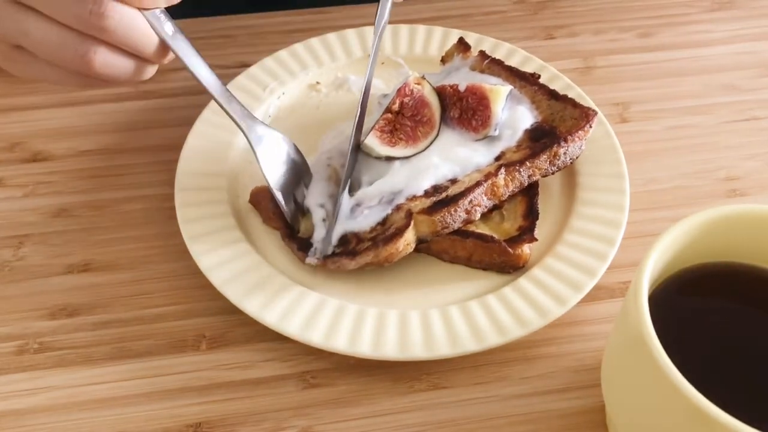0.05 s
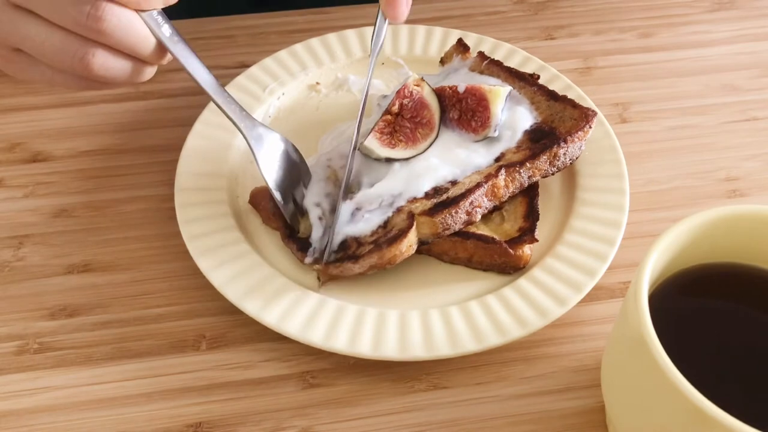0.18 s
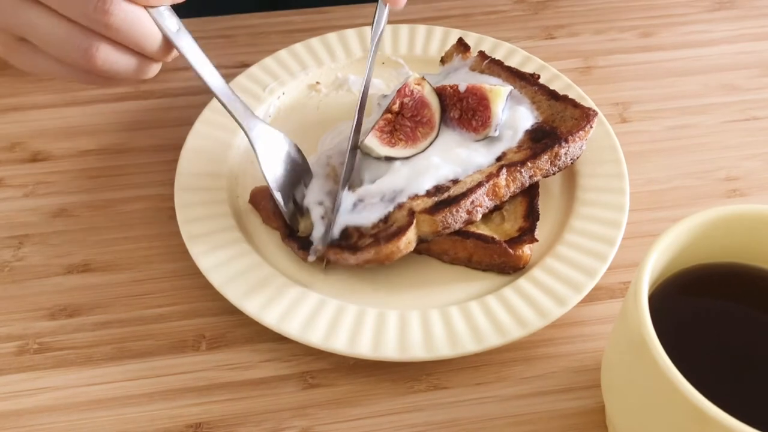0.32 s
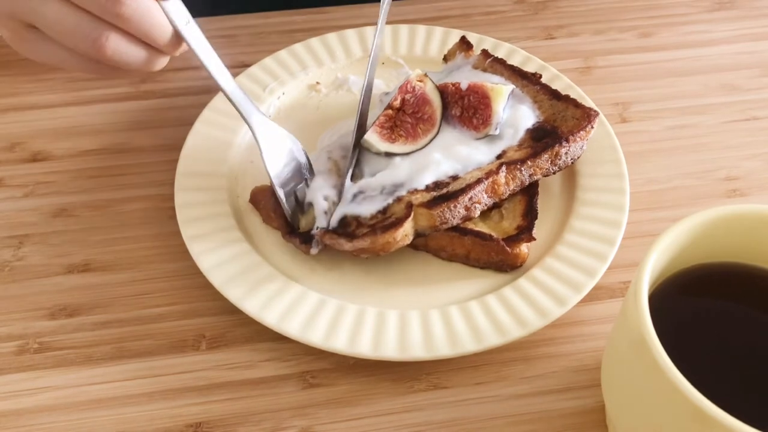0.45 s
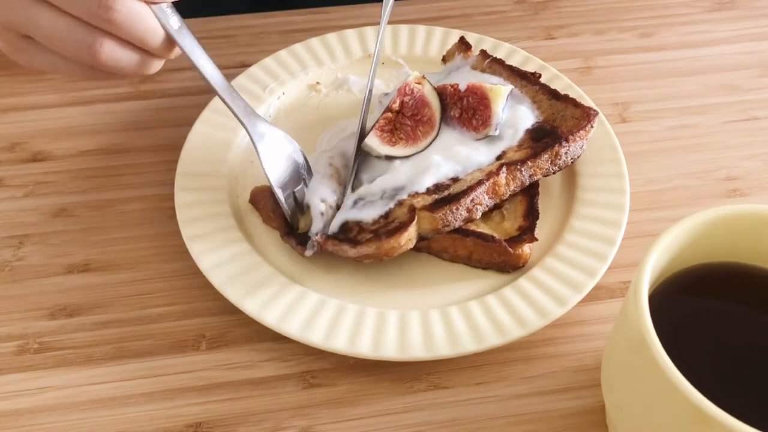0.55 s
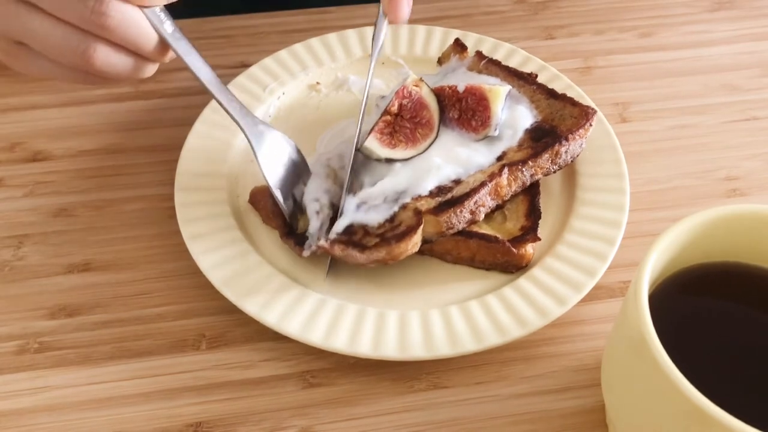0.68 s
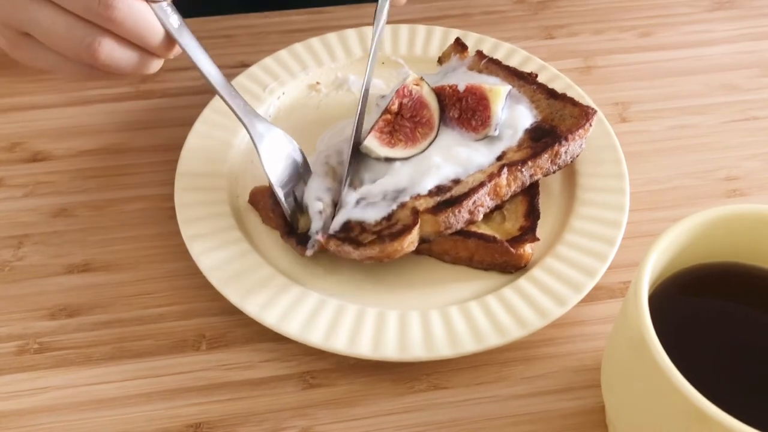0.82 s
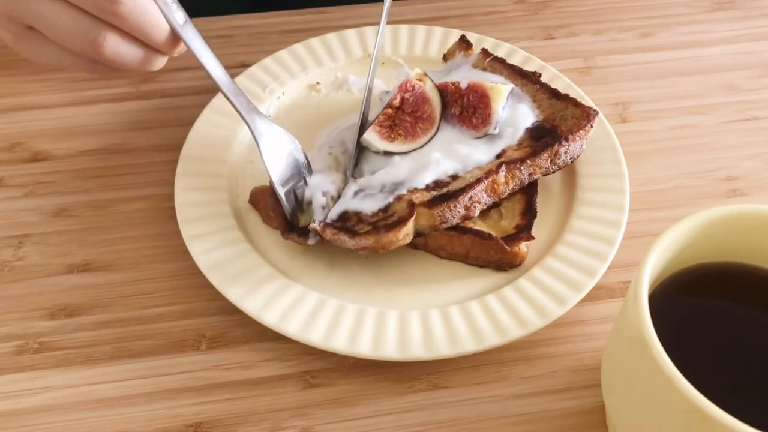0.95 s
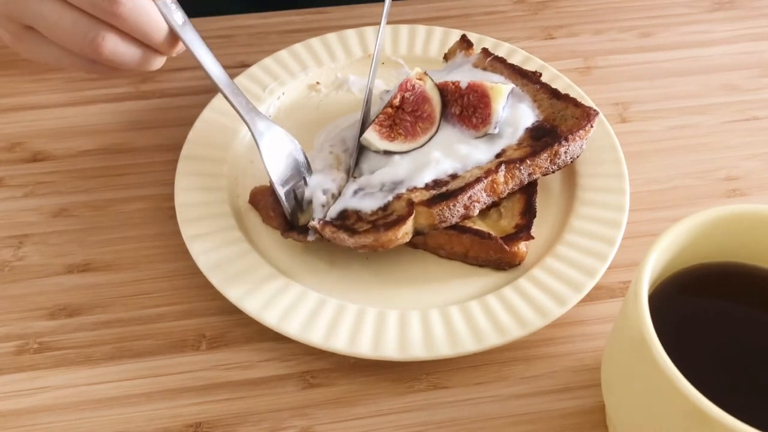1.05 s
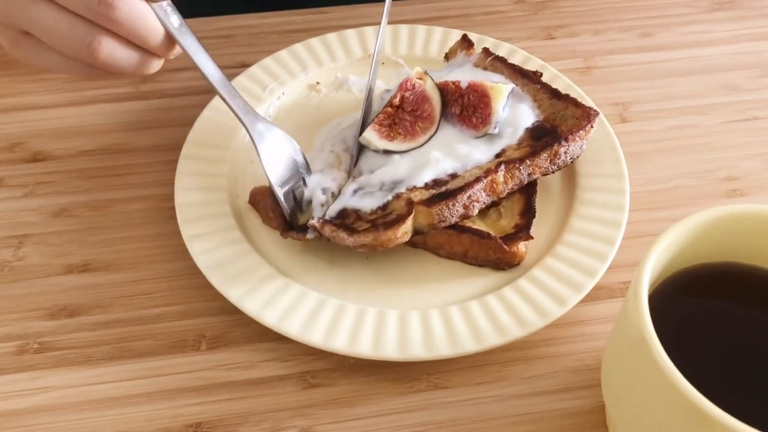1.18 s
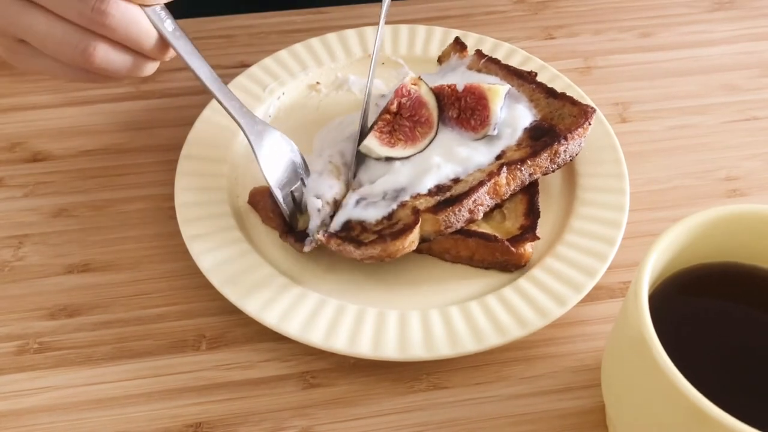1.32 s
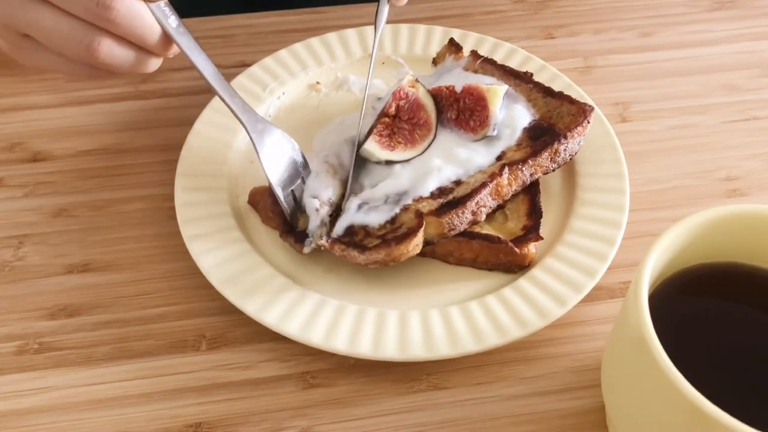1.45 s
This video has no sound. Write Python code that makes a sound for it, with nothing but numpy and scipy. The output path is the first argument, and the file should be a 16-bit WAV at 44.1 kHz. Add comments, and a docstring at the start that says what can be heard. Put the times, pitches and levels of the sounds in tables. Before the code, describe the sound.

A serrated knife cuts crisp toast on a ceramic plate, heard close in a quiet room: faint scrape, sharp plate clack, short crunchy strokes with a duller knock, then tiny crumb ticks over a faint low hum.

```python
"""Knife sawing through toast

In a quiet room, close to the microphone, a serrated blade saws toast on a ceramic plate.
Random tooth clicks ring blade, plate and table modes, and coloured noise makes the crust crunch.
The knife breaks through and knocks the plate twice: noise cracks, dying sines ring, the table thuds.
Crumbs tick as short noise puffs; far away an appliance hums as narrow noise under soft air noise.
"""
import sys
import numpy as np
from scipy import signal
from scipy.io import wavfile
from scipy.ndimage import uniform_filter1d

SR = 44100
rng = np.random.default_rng(int(sys.argv[2]) if len(sys.argv) > 2 else 0)


def unload_audio(sound):
    """Save the sound as a 16-bit wav file, at the path given as the first command line argument."""
    columns = np.transpose(np.atleast_2d(sound))
    # keep every value between -1 and 1, then stretch to whole-number steps
    steps = np.round(np.clip(columns, -1, 1) * 32767)
    wavfile.write(sys.argv[1], SR, steps.astype(np.int16))


def amplitude_ratio(level_db):
    """Convert a level in decibels to the matching linear amplitude (field) ratio."""
    exponent = np.asarray(level_db, float) / 20
    return 10 ** exponent


N = 66150  # samples, 1.5 s

CONTACT_S = 0.0004  # onset ramp of the crack and of the skidding blade
MAIN_BELOW_HZ, MAIN_ABOVE_HZ = 3000, 4000  # the main blade modes lie between these


def evened(x):
    """Scale to an rms of 1."""
    return x / np.sqrt(np.mean(x ** 2) + 1e-20)


def read(points, hz):
    """Interpolate a (Hz, value) curve along log frequency."""
    f, value = np.transpose(points)
    return np.interp(np.log(hz + 1), np.log(f + 1), value)


def add(mix, s, sound):
    """Add a sound to the mix in place, from s seconds on."""
    part = mix[round(s * SR):][:len(sound)]
    part += sound[:len(part)]


def ring(modes, rise_s):
    """Sum of dying sines of alternate sign after a short rise."""
    t = np.arange(SR // 3) / SR
    tones = 0
    for k, (hz, db, t60) in enumerate(modes):
        tones = tones + (-1) ** k * amplitude_ratio(db - 60 * t / t60) * np.sin(2 * np.pi * hz * t)
    return tones * (1 - np.exp(-t / max(rise_s, 1e-5)))


def band(x, hz, width):
    """One resonance of gain 1: shift down to 0 Hz, smooth, shift back up."""
    turn = np.exp(2j * np.pi * hz * np.arange(len(x)) / SR)
    r = np.exp(-np.pi * width / SR)
    return 2 * (turn * signal.lfilter([1 - r], [1, -r], x / turn)).real


def coloured(spectrum, patchy_db):
    """Noise of a given spectrum, at rms 1, with drifting louder and softer patches."""
    frames, hz = N // 256 + 5, np.fft.rfftfreq(1024, 1 / SR)
    a, b, patches = rng.standard_normal((frames, 513, 3)).T
    patches = uniform_filter1d(patches, size=12, axis=0)  # across frequency
    patches = evened(uniform_filter1d(patches, size=10, axis=1))  # along time
    z = (a + 1j * b) * amplitude_ratio(read(spectrum, hz)[:, None] + patchy_db * patches)
    return evened(signal.istft(z, nperseg=1024, noverlap=768)[1][:N])


# The blade's mode frequencies in Hz.
BLADE_MODE_HZ = [2700, 3260, 3460, 4750, 4980, 5900, 7500, 10280, 13200, 14500, 15620]
# How the blade's modes ring. Each row: relative level in dB, t60 in seconds.
BLADE_MODE_RING = [(-12, .015), (-16, .04), (0, .03), (-21, .016), (-23, .025), (-14, .022), (-12, .016),
                   (-16, .012), (-23, .02), (-25, .012), (-22, .014)]


def blade_modes():
    """The knife blade as rows of (Hz, dB, t60 s)."""
    return [(hz, *rest) for hz, rest in zip(BLADE_MODE_HZ, BLADE_MODE_RING)]


# The ceramic plate's mode frequencies in Hz.
PLATE_MODE_HZ = [1380, 1750, 1880, 2045, 2110, 3500, 5127, 5160, 6951, 8927, 11045, 13250, 15600]
# How the plate's modes ring. Each row: relative level in dB, t60 in seconds.
PLATE_MODE_RING = [(5, 0.025), (-2.5, 0.044), (-6.5, 0.11), (0, 0.069), (-6, 0.14), (-42, 0.11), (4, 0.068),
                   (-16, 0.089), (-8.5, .1), (-11, 0.095), (-9, 0.083), (-16, 0.068), (-19, .07)]


def plate_modes():
    """The ceramic plate as rows of (Hz, dB, t60 s)."""
    return [(hz, *rest) for hz, rest in zip(PLATE_MODE_HZ, PLATE_MODE_RING)]


# Table top under the plate. Each row: frequency in Hz, relative level in dB, t60 in seconds.
TABLE_MODES = [(134.3, -9, 0.074), (209, -9, 0.06), (263, -9, 0.032), (416.2, -16, 0.12),
               (512.6, -9, 0.064), (572, -17.5, 0.18), (625.3, -6, 0.13), (723, -18, 0.24), (762, -12, 0.1),
               (877, -1, 0.021), (934, -2.5, 0.022), (972, 12, 0.01), (1200, 5, 0.0084)]


def table_modes(deep_db):
    """The table top; modes under 900 Hz need a heavy blow and shift by deep_db."""
    return [(hz, db + deep_db * (hz < 900), t60) for hz, db, t60 in TABLE_MODES]


# Sawing strokes of the blade. Each row: start in seconds, length in seconds, level in dB,
# place of the peak from 0 to 1 (kept within .05 to .95), then, against that level,
# grit in dB (at most -7), upper blade modes in dB, plate in dB.
SAW_STROKES = [(0.141, 0.045, -60.5, 0.87, -2, 11, 3), (0.251, 0.21, -68.5, 0.95, -13, 1, -5.5),
               (0.595, 0.018, -48, 0.6, -24, -9, -34), (0.617, 0.037, -60.5, 0.75, 16, 1, -43),
               (0.653, 0.09, -52, 0.4, -7, 5.5, -13.5), (0.776, 0.091, -55.5, 0.66, 0, 1, -42),
               (.86, 0.11, -79, 1, -34, -22, -36), (1.374, .11, -60.5, 0.41, -4.5, 0, -9)]
# Spectrum of the crunching crust. Each row: frequency in Hz, relative level in dB.
GRIT_SPECTRUM = [(900, -40), (2000, -6), (3500, 0), (7500, -3), (10000, -11), (13000, -15), (16000, -15)]


def sawing():
    """Uneven tooth clicks ring blade, plate and table; the crust crunches along."""
    grit_most_db = -7
    teeth_per_s, teeth_spread_db = 2000, 1.5  # mean rate; spread of click sizes
    stroke_table_db = -1  # table against the main blade modes
    grain = 0.5  # share of the crunch that follows the tooth clicks

    press = np.zeros((4, N))  # main blade and table, upper blade, plate, grit
    for start, length, db, peak, grit_db, upper_db, plate_db in SAW_STROKES:
        u = np.linspace(0, 1, round(length * SR))
        peak = np.clip(peak, .05, .95)
        shape = amplitude_ratio(db) * np.sin(np.pi / 2 * np.minimum(u / peak, (1 - u) / (1 - peak)))
        for row, share_db in zip(press, (0, upper_db, plate_db, min(grit_db, grit_most_db))):
            add(row, start, amplitude_ratio(share_db) * shape)

    size = amplitude_ratio(teeth_spread_db * np.minimum(rng.exponential(1, N), 4)) * rng.choice([-1., 1.], N)
    teeth = evened(size * (rng.random(N) < teeth_per_s / SR))

    blade = blade_modes()
    main = ring([m for m in blade if MAIN_BELOW_HZ < m[0] < MAIN_ABOVE_HZ], .0001)
    unit = np.linalg.norm(main)
    upper = ring(blade, .0001) + main  # the main modes have opposite signs here and cancel
    table = ring(table_modes(0), 0.00017)
    plate = ring(plate_modes(), .0001)
    bodies = (main / unit + amplitude_ratio(stroke_table_db) * table / np.linalg.norm(table),
              upper / unit,
              plate / np.linalg.norm(plate))
    rung = sum(signal.oaconvolve(teeth * p, body)[:N] for p, body in zip(press, bodies))

    clumps = 1 - grain + grain * evened(uniform_filter1d(abs(teeth), size=60))
    return rung + press[3] * clumps * coloured(GRIT_SPECTRUM, patchy_db=2)


def skidding_blade():
    """Blade modes stay level, higher ones for less time, while the blade skids; then they die."""
    skid_s = 0.0035  # at 3000 Hz, shorter in proportion for higher modes
    tilt_db = -6  # per octave above 4000 Hz
    t = np.arange(SR // 3) / SR
    held = 0
    for (hz, db, t60), turn in zip(blade_modes(), rng.random(len(BLADE_MODE_HZ))):
        tilt = tilt_db * max(np.log2(hz / MAIN_ABOVE_HZ), 0)
        dying_s = np.maximum(t - skid_s * MAIN_BELOW_HZ / hz, 0)
        held = held + amplitude_ratio(db + tilt - 60 * dying_s / t60) * np.sin(2 * np.pi * (hz * t + turn))
    return held * np.minimum(t / CONTACT_S, 1)


# Knife meets plate. Each row: time in seconds, levels of crack, blade, plate and table in dB,
# lag of the table in seconds, time constant of its rise in seconds, shift of its deep modes in dB.
PLATE_BLOWS = [(0.2095, -15.5, -24.5, -27, -14, 0.00287, 0.00047, -2),
               (.6116, -35.5, -28, -76, -25, 0.00356, 0.0024, -9)]


def blows():
    """A crack and the plate first, the skidding blade, then the table with a slow low sway."""
    crack_t60, crack_hz, crack_width_hz = 0.012, 3500, 2330
    sway_hz, sway_db, sway_span_s = 64, -30, 0.024  # the sway is strongest at 0.7 of its span
    out = np.zeros(N)
    t = np.arange(1500) / SR
    slow = np.arange(SR // 4) / SR / sway_span_s
    for s, crack_db, blade_db, plate_db, table_db, lag, rise, deep_db in PLATE_BLOWS:
        crack = evened(band(rng.standard_normal(1500), crack_hz, crack_width_hz))
        add(out, s, amplitude_ratio(crack_db - 60 * t / crack_t60) * crack * np.minimum(t / CONTACT_S, 1))
        add(out, s, amplitude_ratio(plate_db) * ring(plate_modes(), .0001))
        add(out, s, amplitude_ratio(blade_db) * skidding_blade())
        add(out, s + lag, amplitude_ratio(table_db) * ring(table_modes(deep_db), rise))
        swell = (slow * np.exp(1 - slow ** 2)) ** 2
        sway = swell * np.sin(2 * np.pi * sway_hz * sway_span_s * slow)
        add(out, s, amplitude_ratio(table_db + deep_db + sway_db) * sway)
    return out


# Crumbs snapping beside the blade. Each row: time in seconds, peak level in dB, centre in Hz,
# width of each of two filter passes in Hz, decay time constant of the noise in seconds.
CRUMB_TICKS = [(0.0855, -49.5, 6040, 6260, .001), (0.1693, -41.5, 5450, 6940, .001),
               (0.177, -45, 13500, 3940, 0.0012), (0.36, -57, 12900, 4000, 0.0024),
               (0.365, -51.5, 13400, 3050, 0.0022), (0.366, -51.5, 8000, 8850, 0.0044),
               (0.505, -59, 12000, 8100, 0.0025), (0.516, -38, 3500, 6000, 0.0019),
               (.630, -58, 14500, 3000, 0.0023), (0.935, -49, 14200, 2500, 0.0027),
               (1.07, -51, 1530, 900, .003), (1.114, -56, 11500, 4000, 0.0024),
               (1.127, -58, 1940, 2040, 0.0026), (1.141, -48, 1710, 1200, 0.0024),
               (1.257, -66, 12000, 8800, 0.0025), (1.263, -50.5, 1500, 2970, 0.0025)]


def crumbs():
    """Each snap is a very short puff of noise in its own band."""
    out, t = np.zeros(N), np.arange(600) / SR
    noises = rng.standard_normal((len(CRUMB_TICKS), 600))
    for (s, db, hz, width, length), noise in zip(CRUMB_TICKS, noises):
        puff = band(band(noise * np.exp(-t / length), hz, width), hz, width)
        add(out, s, amplitude_ratio(db) * puff / abs(puff).max())
    return out


# Decay of the quiet room around the plate. Each row: frequency in Hz, t60 in seconds.
ROOM_DECAY = [(100, .3), (400, .4), (800, .45), (1400, .45), (2000, .42), (5000, .36), (8000, .25),
              (12000, .17)]


def room(x):
    """Sparse taps of random sign, each band dying at its own speed."""
    start_s, build_s, level_db = 0.004, 0.015, -15.5
    taps = np.zeros(SR // 2)
    at = np.arange(0, SR // 2 - 20, 20)
    taps[at + rng.integers(0, 20, len(at))] = rng.choice([-1., 1.], len(at))
    hz, t, z = signal.stft(taps, SR, nperseg=256)
    dying = amplitude_ratio(-60 * t / read(ROOM_DECAY, hz)[:, None])
    tail = signal.istft(z * dying, SR, nperseg=256)[1]
    tail = tail * np.minimum(np.arange(len(tail)) / SR / build_s, 1)
    out = np.zeros(N)
    add(out, start_s, signal.fftconvolve(x, tail / np.linalg.norm(tail)))
    return amplitude_ratio(level_db) * out


# Bands of the far appliance. Each row: centre in Hz, width of each of two filter passes in Hz,
# relative level in dB.
HUM_BANDS = [(144.5, 21, -1), (207.4, 73, -11), (272.2, 18, -15.5)]
# The hum swells and sinks. Each row: time in seconds, level in dB.
HUM_SWELL = [(0, -46), (.1, -49.5), (.19, -43), (.28, -53), (.49, -64), (.54, -47), (.78, -61),
             (.84, -52.5), (.91, -54.5), (.95, -46.5), (1.08, -55), (1.11, -47), (1.32, -52), (1.38, -44.5),
             (1.5, -52)]


def appliance_hum():
    """Narrow bands of low noise waver like a far appliance."""
    hum = 0
    for hz, width, db in HUM_BANDS:
        tone = band(band(rng.standard_normal(N), hz, width), hz, width)
        hum = hum + amplitude_ratio(db) * evened(tone)
    return amplitude_ratio(np.interp(np.arange(N) / SR, *np.transpose(HUM_SWELL))) * hum


# Spectrum of the room air. Each row: frequency in Hz, relative density in dB per Hz.
AIR_SPECTRUM = [(18, -68), (30, -8), (80, -21), (112, -20), (157, -3.5), (266, -13), (650, -15),
                (800, -12.5), (1220, -24), (1500, -31), (2410, -29), (4000, -34.5), (6000, -39),
                (8000, -44.5), (12000, -44.5), (15500, -45)]
# Swell of the room air. Each row: time in seconds, change of level in dB.
AIR_CHANGE = [(0, 1), (.4, 3.5), (.6, 2.5), (.9, 1), (1.2, 0.5), (1.5, 1.5)]


def room_air():
    """Soft wide noise, patchy in time and frequency, slowly swelling."""
    air_db = -54.5
    swell_db = np.interp(np.arange(N) / SR, *np.transpose(AIR_CHANGE))
    return amplitude_ratio(air_db + swell_db) * coloured(AIR_SPECTRUM, patchy_db=2.0)


def scene():
    """Knife, plate, table and crumbs with their room, over the hum and air; one channel."""
    near = sawing() + blows() + crumbs()
    return (near + room(near) + appliance_hum() + room_air())[None]


def top_cut(x):
    """Nothing passes above the cut-off."""
    return signal.sosfilt(signal.butter(12, 16650, fs=SR, output="sos"), x)


def record(dry):
    """The microphone channel: a low cut at 58 Hz and a treble limit at 15950 Hz."""
    low_cut = signal.butter(2, 58, "high", fs=SR, output="sos")
    edge = signal.firwin(255, 15950, window=("kaiser", 8), fs=SR)
    mix = signal.oaconvolve(signal.sosfilt(low_cut, dry), edge[None], "same")
    return top_cut(mix)


dry = scene()
out = record(dry)
unload_audio(out)
```